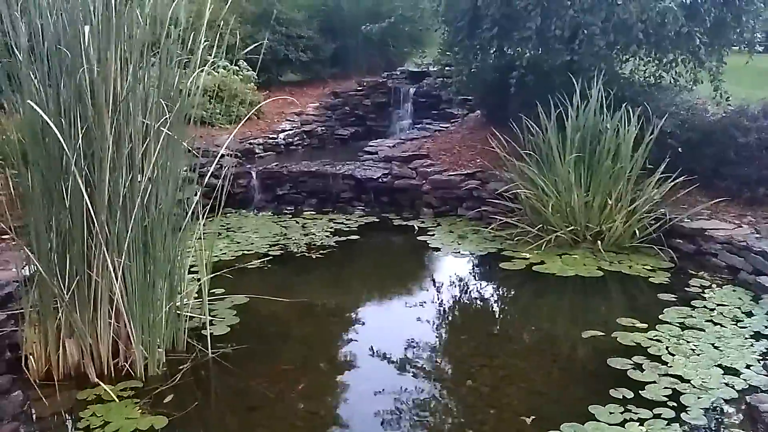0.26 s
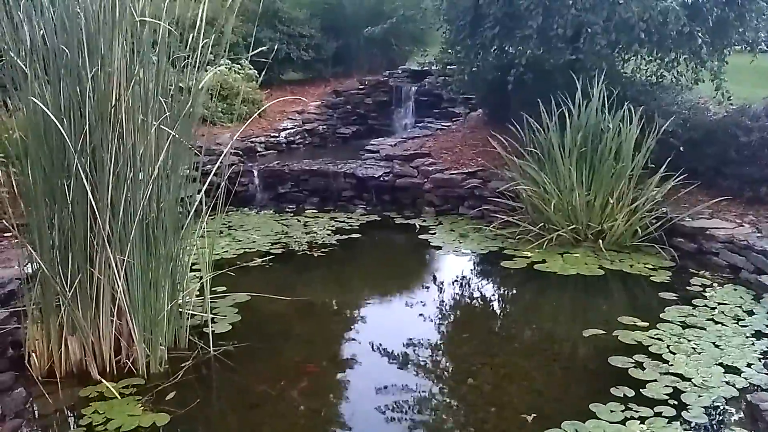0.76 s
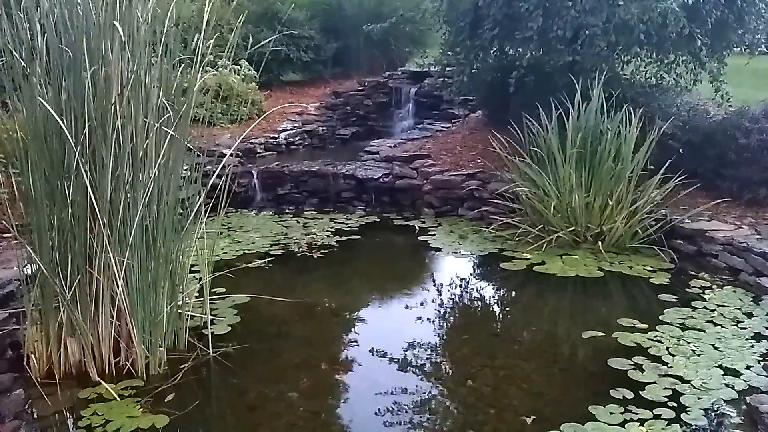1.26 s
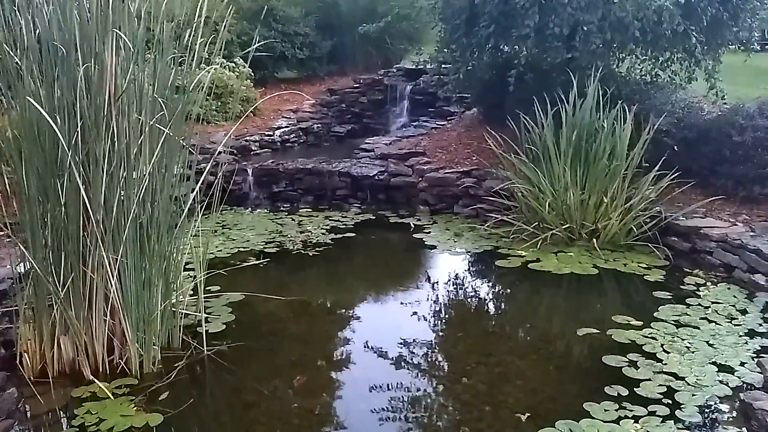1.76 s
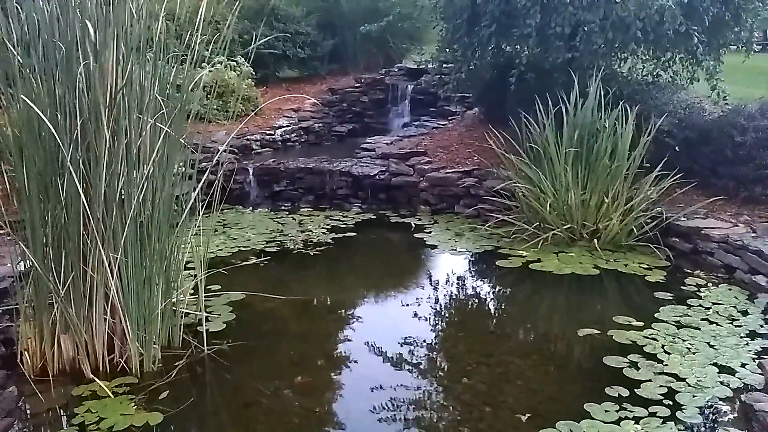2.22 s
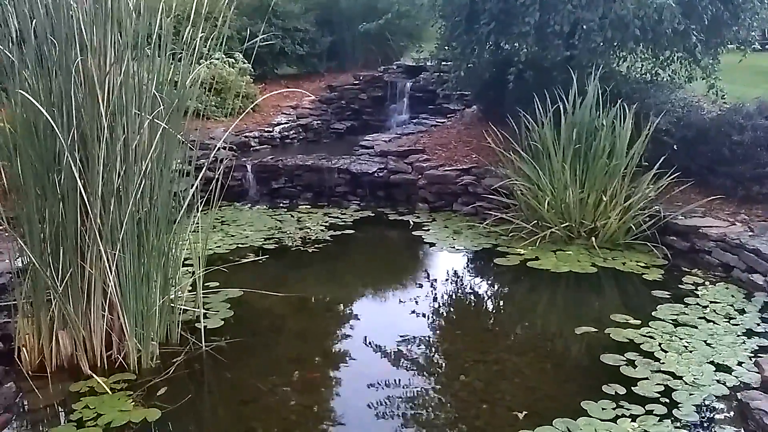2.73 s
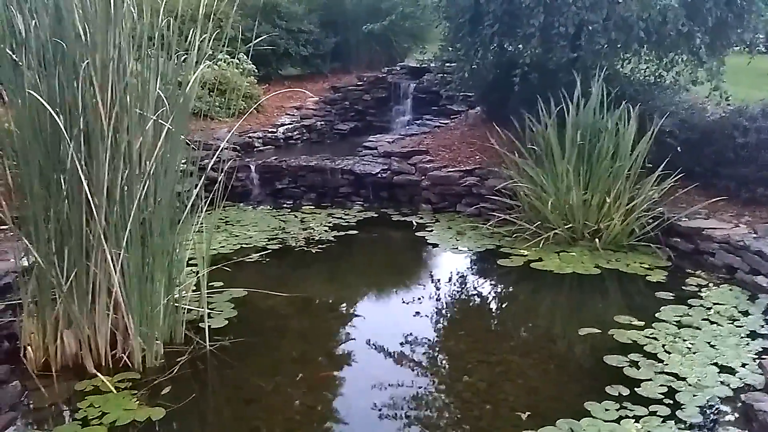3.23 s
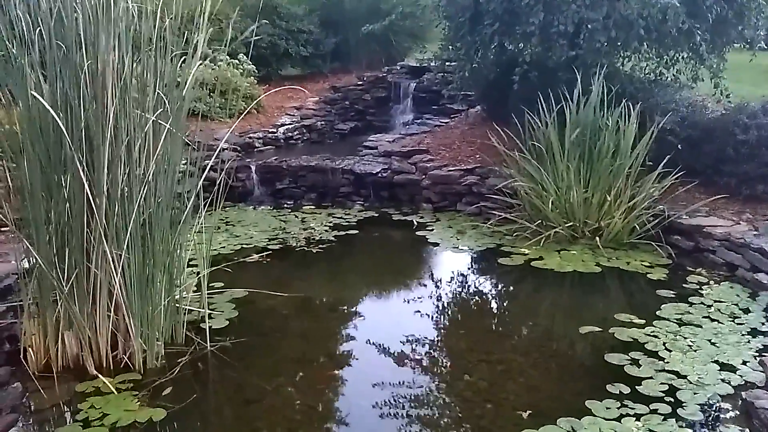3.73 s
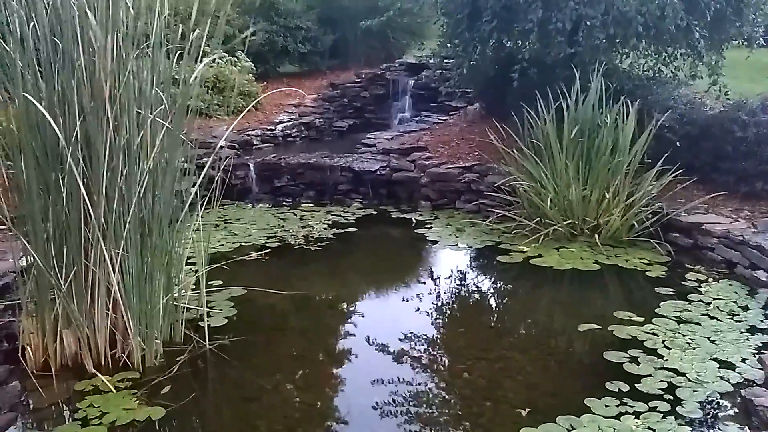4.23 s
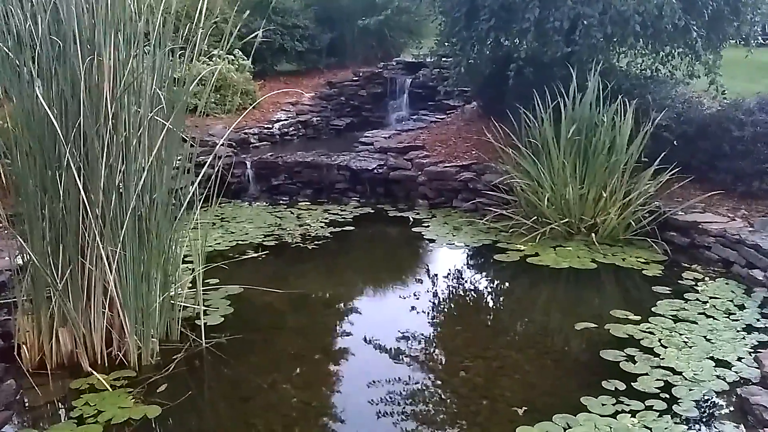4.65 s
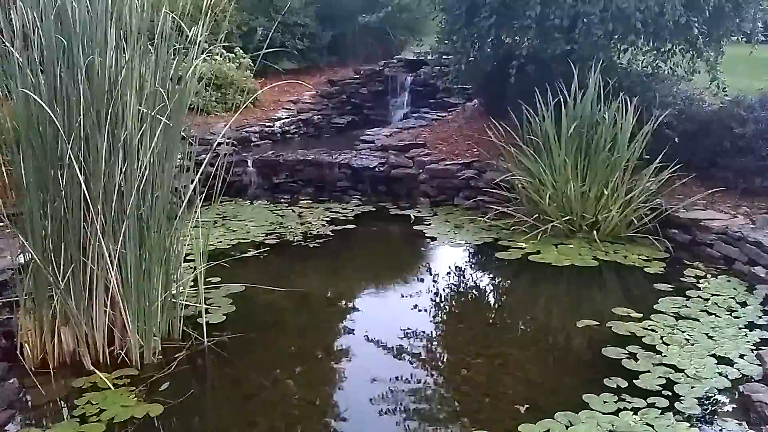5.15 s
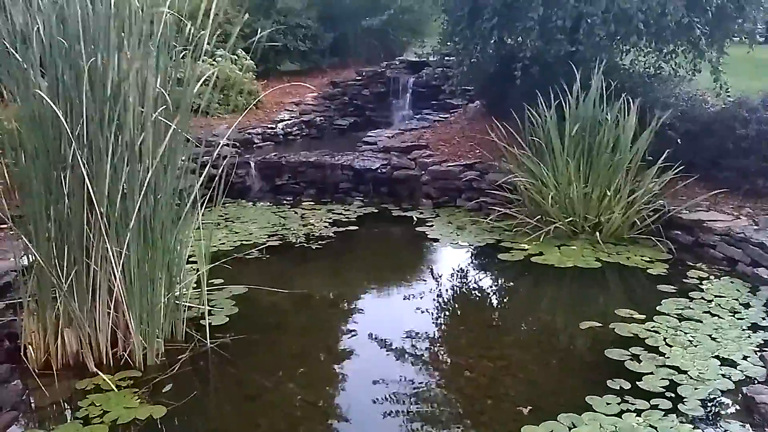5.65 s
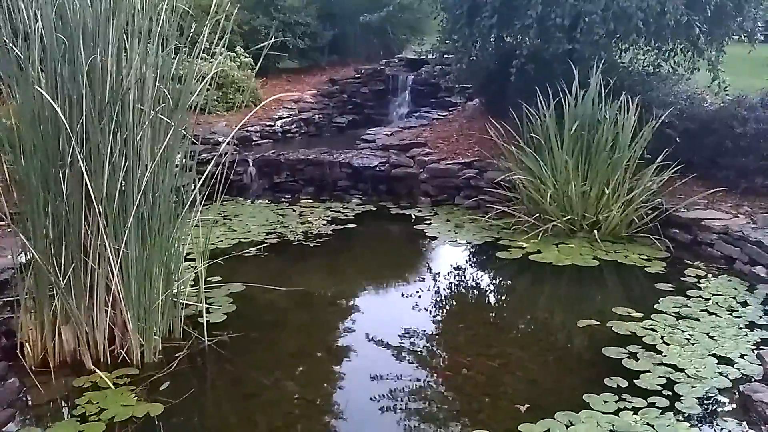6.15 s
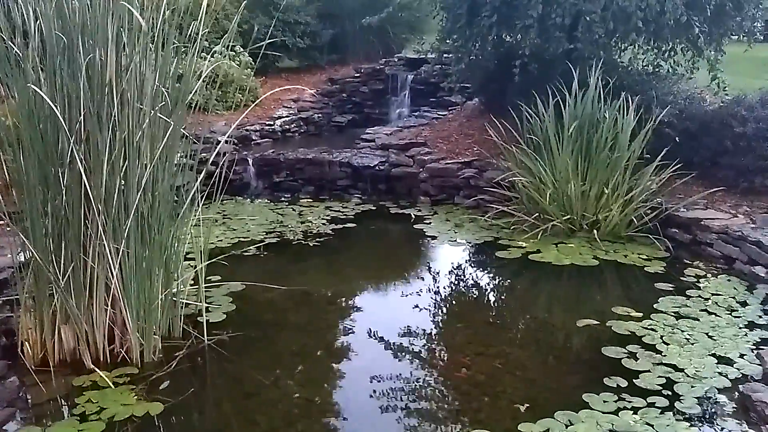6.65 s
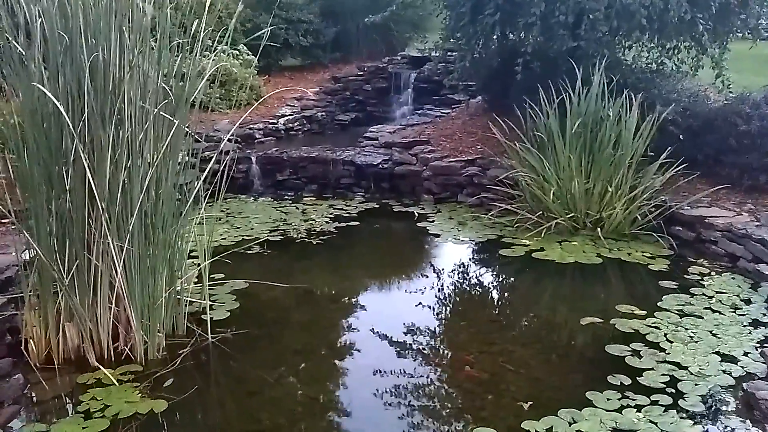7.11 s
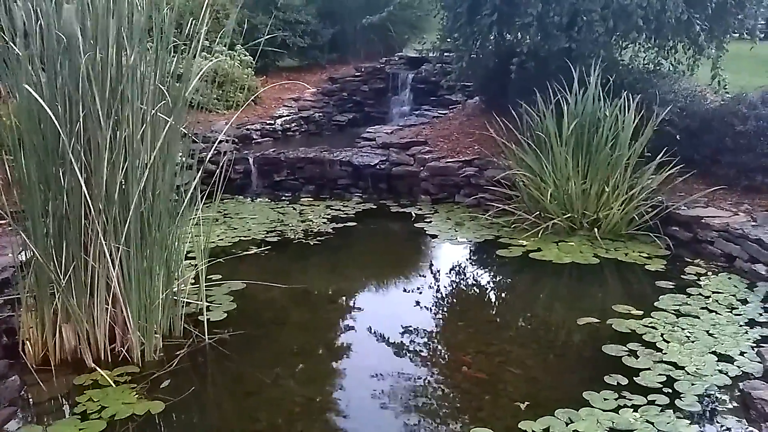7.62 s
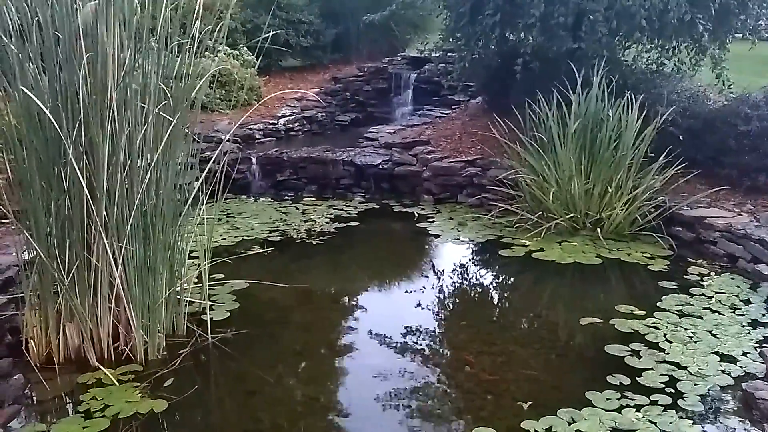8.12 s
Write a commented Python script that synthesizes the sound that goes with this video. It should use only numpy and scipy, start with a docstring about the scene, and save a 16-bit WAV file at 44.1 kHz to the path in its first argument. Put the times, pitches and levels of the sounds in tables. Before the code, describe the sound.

A small stone waterfall runs into a garden pond, a continuous bright splashing hiss with uneven gurgles, plopping bubbles and droplets ticking on rock. The water is louder on the left. Wind bumps the microphone in short low rumbles from either side, strongest near the end and mostly on the right. A few soft knocks touch the left side in the first half, and a faint pump hum lies underneath.

```python
"""Garden waterfall in wind

A small waterfall runs over stones into a pond, heard by two microphone ports, the left one facing it.
Surges lift the gurgle, splash and patter; the spray swells on its own. Bubbles plop, droplets tick,
slugs of water slap stone, and glassy rings and thin whistles come and go. Wind buffets each port
separately over a pump's hum; a few knocks and one flap of wind thump at the left port."""
import sys
import numpy as np
from scipy import signal
from scipy.io import wavfile
from scipy.ndimage import uniform_filter1d

SR = 44100
rng = np.random.default_rng(int(sys.argv[2]) if len(sys.argv) > 2 else 0)


def pcm_store(signal):
    """Save signal as 16-bit PCM."""
    levels = np.round(np.clip(np.atleast_2d(signal), -1, 1) * 32767)
    wavfile.write(sys.argv[1], SR, levels.astype(np.int16).T)


N = 369558
TIME_S = np.arange(N) / SR


def gain_of(db):
    """Decibels to amplitude."""
    return 10 ** (np.asarray(db) / 20)


def unit_rms(x):
    """Scales to rms 1."""
    return x / np.sqrt(np.mean(x ** 2) + 1e-20)


def column(table, index, at, warp=np.asarray):
    """Interpolates one column of a table against the first."""
    rows = np.array(table, float)
    return np.interp(warp(at), warp(rows[:, 0]), rows[:, index])


def add(mix, start_s, sound):
    """Mixes a sound in, cut off at the end of the mix."""
    part = mix[round(start_s * SR):][:len(sound)]
    part += sound[:len(part)]


def wobble(shape):
    """Slow noise at rms 1."""
    return unit_rms(uniform_filter1d(uniform_filter1d(rng.standard_normal(shape), size=700), size=700))


def band_noise(size, hz, width_hz):
    """Noise through a steep resonance: shifted down by hz, smoothed twice, shifted back."""
    carrier = np.exp(2j * np.pi * hz * np.arange(size) / SR)
    pole = np.exp(-np.pi * width_hz / SR)
    shifted = rng.standard_normal(size) / carrier
    smoothed = signal.lfilter([(1 - pole) ** 2], [1, -2 * pole, pole ** 2], shifted)
    return 2 * (carrier * smoothed).real


def tone(hz, width_hz, size, fuzz):
    """A wavering pitch: narrow noise that keeps the share fuzz of its level swings."""
    narrow = band_noise(size + SR // 4, hz, width_hz)[SR // 4:]
    envelope = np.sqrt(abs(uniform_filter1d(narrow ** 2, size=400)) + 1e-20)
    return unit_rms(narrow / envelope ** (1 - fuzz))


def bubble(hz, t60_s, glide, swell_s, phase_rad=0):
    """A bubble's pulsing dies fast while its pitch climbs near the surface."""
    t = np.arange(round(t60_s * SR)) / SR
    pulsing = np.sin(2 * np.pi * hz * t * (1 + glide * t / t60_s) + phase_rad)
    return pulsing * gain_of(-60 * t / t60_s) * (1 - np.exp(-t / swell_s))


def water(colour, level_db, lead_ms, phase_rad, patch_db, flicker_db, drops_per_s, drop_share, frame=256):
    """Noise and single drops share one colour; patches drift and flickers land on all pitches."""
    drops = gain_of(2.9 * np.minimum(rng.exponential(1, N), 5)) * (rng.random(N) < drops_per_s / SR)
    source = np.sqrt(1 - drop_share) * rng.standard_normal((2, N))
    source += np.sqrt(drop_share) * unit_rms(drops * rng.choice([-1., 1.], N))
    framing = dict(nperseg=frame, noverlap=frame * 3 // 4)
    hz, t, (left, other) = signal.stft(source, SR, **framing)
    patches = uniform_filter1d(rng.standard_normal(left.shape), size=4, axis=0)
    patches = unit_rms(uniform_filter1d(patches, size=24, axis=1))
    flicker = unit_rms(uniform_filter1d(rng.standard_normal(len(t)), size=9))
    left_db, right_db, likeness = (column(colour, k, hz + 1, np.log)[:, None] for k in (1, 2, 3))
    # The right port hears the shared part lead_ms earlier, its phase turned.
    lead = np.exp(1j * (2 * np.pi * hz * lead_ms / 1000 + phase_rad))[:, None]
    right = likeness * lead * left + np.sqrt(1 - likeness ** 2) * other
    spectrum = np.array([left * gain_of(left_db), right * gain_of(right_db)])
    spectrum *= gain_of(patch_db * patches + flicker_db * flicker)
    out = signal.istft(spectrum, SR, **framing)[1][:, :N]
    return out / np.std(out[0]) * gain_of(level_db)


# Each row: start in seconds, lift of the gurgle in dB.
SURGE_LIFTS = [(.07, 2), (.56, 5), (.995, 4.5), (1.11, 5.5), (1.459, 8), (2.32, 5.5), (2.61, 7.5),
               (2.94, 3.5), (3.1, 5), (3.55, 9), (4.045, 7), (4.499, 4.5), (4.772, 8), (5.068, 7),
               (5.661, 4), (6.531, 9), (6.85, 10), (6.979, 10), (7.18, 8), (7.65, 5), (8.109, 3)]

def surges(rise_s=0.005, fall_s=0.28):
    """Lift in dB: each surge of the fall rises quickly and sinks back slowly."""
    t = TIME_S[::32]
    corners_s = [0, rise_s, rise_s + fall_s]
    lifts_db = [np.interp(t - start_s, corners_s, [0, db, 0]) for start_s, db in SURGE_LIFTS]
    return np.interp(TIME_S, t, np.max(lifts_db, axis=0))


# Each row: frequency in Hz, left and right relative level in dB, left-right likeness from 0 to 1.
GURGLE_COLOUR = [(218, -67.5, -81, 1), (350, -81.5, -82, 0.52), (476, -73.5, -77.5, 0.21),
                 (620, -82.5, -76.5, 0.92), (850, -78, -83.5, 0.98), (960, -73.5, -77, 0.2),
                 (1100, -78.5, -81.5, 0), (1250, -86, -76, 0.45), (1434, -76, -79.5, 1),
                 (1690, -76, -75, 0.44), (2060, -79, -80, 1), (2300, -71, -76, 0.85),
                 (2670, -84.5, -83.5, 0.2)]

def gurgle(lift_db):
    """The low, patchy part of the fall."""
    return water(GURGLE_COLOUR, -55.5 + lift_db, lead_ms=0, phase_rad=3.34,
                 patch_db=3.5, flicker_db=2.5, drops_per_s=350, drop_share=0.041, frame=512)


# Each row: frequency in Hz, left and right relative level in dB, left-right likeness from 0 to 1.
SPLASH_COLOUR = [(2110, -106.5, -105.5, 0.097), (2330, -76, -68.5, 0.092), (2856, -70, -82, 0.56),
                 (2950, -59.5, -60, 0.17), (3100, -66, -82, .15), (3350, -60.5, -88, .2),
                 (3410, -64, -71, 0.15), (4200, -60, -69.5, 0.16), (4900, -58.5, -68.5, .2),
                 (6080, -64.5, -82, 0.45), (5900, -68.5, -84, .12), (7900, -80.5, -80, .12)]
# Each row: time in seconds, level in dB before trim and surges.
SPLASH_SWELL = [(0.0, -40.5), (1.2, -38), (2.2, -38.5), (3.4, -39.5), (4.7, -37.5), (5.5, -40), (6.3, -39),
                (7.0, -37), (8.37, -40.5)]

def splash(lift_db, trim_db=-2.12):
    """The middle of the fall, dense with drops."""
    level_db = column(SPLASH_SWELL, 1, TIME_S) + lift_db + trim_db
    return water(SPLASH_COLOUR, level_db, lead_ms=0.461, phase_rad=1.57,
                 patch_db=2, flicker_db=-0.23, drops_per_s=810, drop_share=0.12)


# Each row: frequency in Hz, left and right relative level in dB, left-right likeness from 0 to 1.
SPRAY_COLOUR = [(5000, -106.5, -105, 0.043), (5400, -70, -78.5, 0.13), (7530, -58, -73.5, 0.12),
                (8940, -58, -72, 0.11), (11300, -61, -71.5, 0.087), (11900, -65, -85, 0.21),
                (14300, -74.5, -81, 0.089), (14200, -87, -106, 0.07), (15700, -73, -88, 0.11)]
# Each row: time in seconds, left level in dB.
SPRAY_SWELL = [(0.0, -39), (0.2, -36.5), (0.7, -39.5), (0.74, -30), (0.82, -34), (1.2, -39), (1.89, -35),
               (2.39, -41.5), (2.64, -40.5), (3.17, -37), (3.56, -39), (3.83, -37), (4.01, -42), (4.4, -42),
               (4.48, -36), (4.58, -41), (4.66, -36), (4.78, -35.5), (5.0, -39.5), (5.11, -34.5),
               (5.28, -42.5), (5.35, -35), (5.4, -39), (5.44, -35.5), (5.7, -42), (6.03, -37), (6.35, -39),
               (6.58, -35), (6.77, -37.5), (7.0, -34), (8.02, -35.5), (8.37, -44.5)]

def spray():
    """The high hiss of the fall, swelling on its own."""
    return water(SPRAY_COLOUR, column(SPRAY_SWELL, 1, TIME_S), lead_ms=0.1, phase_rad=-1.1,
                 patch_db=2, flicker_db=1.14, drops_per_s=300, drop_share=0.065)


def patter(lift_db, base_db=-50.5, drops_per_s=300, ring_cycles=39):
    """Fine droplets: tiny bubbles of eight sizes, each ringing briefly."""
    drops = gain_of(3.5 * np.minimum(rng.exponential(1, N), 3)) * (rng.random(N) < drops_per_s / SR)
    pitches_hz = np.geomspace(3217, 5480, 8)
    kind = rng.integers(0, len(pitches_hz), N)
    rings = [bubble(hz, ring_cycles / hz, glide=0.035, swell_s=0.0011) for hz in pitches_hz]
    out = sum(signal.oaconvolve(drops * (kind == k), ring)[:N] for k, ring in enumerate(rings))
    return unit_rms(out) * gain_of(base_db + lift_db) * [[1], [-gain_of(-13)]]


# Each row: time in seconds, level at both ports in dB.
BREEZE_SWELL = [(0.0, -60), (.29, -56), (.6, -53), (.8, -54), (1.5, -54.5), (2.0, -51), (2.6, -52),
                (3.6, -50.5), (4.2, -52), (5.1, -48.5), (5.5, -64), (6.3, -51.5), (6.9, -45), (7.5, -46),
                (7.8, -53), (8.37, -55)]
# Each row: peak time in seconds, peak level in dB, port ("left" or "right").
PORT_BUFFETS = [(.79, -41, "right"), (.84, -36.5, "right"), (.91, -39, "right"), (0.956, -33.5, "right"),
                (1.02, -43, "left"), (1.1, -41.5, "right"), (1.14, -42, "right"), (1.368, -34.5, "right"),
                (1.43, -43, "left"), (1.635, -43.5, "left"), (2.248, -39.5, "right"), (2.33, -50, "left"),
                (2.408, -35.5, "left"), (2.515, -33, "left"), (2.6, -36, "right"), (2.707, -27.5, "right"),
                (2.889, -32.5, "right"), (3.33, -38.5, "right"), (3.459, -37, "right"),
                (3.52, -39.5, "right"), (4.511, -35.5, "left"), (4.6, -38, "right"), (4.87, -35, "right"),
                (5.07, -46, "right"), (5.67, -44, "left"), (5.7, -50, "right"), (5.779, -37.5, "right"),
                (5.918, -27.5, "right"), (6.039, -40, "right"), (6.113, -24, "right"),
                (6.178, -33.5, "right"), (6.43, -39, "left"), (6.51, -36, "right"), (6.556, -18.5, "right"),
                (6.628, -24, "right"), (6.69, -41, "left"), (6.68, -33, "right"), (6.735, -30, "right"),
                (6.799, -26, "right"), (6.837, -24.5, "right"), (6.865, -27, "left"),
                (6.895, -29.5, "right"), (6.913, -26.5, "left"), (6.961, -25.5, "left"),
                (6.965, -29.5, "right"), (7.035, -36, "left"), (7.05, -37, "right"), (7.112, -27, "right"),
                (7.14, -36, "right"), (7.261, -32, "right"), (7.38, -36.5, "right")]

def wind_db(t, rise_db_per_s=496, fall_db_per_s=342):
    """Wind level at each port: the breeze plus single buffets."""
    power = np.tile(gain_of(2 * column(BREEZE_SWELL, 1, t)), (2, 1))
    for peak_s, db, port in PORT_BUFFETS:
        drop_db = np.maximum(rise_db_per_s * (peak_s - t), fall_db_per_s * (t - peak_s))
        power[int(port == "right")] += gain_of(2 * (db - drop_db))
    return 10 * np.log10(power)


# Each row: frequency in Hz, relative level in dB, for light wind.
WIND_COLOUR = [(20, -66), (40, 1.5), (60, 8.5), (90, -1), (130, -12.5), (200, -21), (350, -40.5),
               (700, -73)]

def wind(left_stretch=1.47, right_stretch=0.67, lump_db=1.7):
    """Lumpy low turbulence at each port; strong gusts stretch its colour upward."""
    framing = dict(nperseg=2048, noverlap=1536)
    hz, t, spectrum = signal.stft(rng.standard_normal((2, N)), SR, **framing)
    frame_db = wind_db(t)
    # Lulls leave a far rumble, shared by the ports in opposite phase.
    shared = np.clip(0.9 - (frame_db.max(0) + 52.5) / 12, 0, 0.95)
    spectrum[1] = np.sqrt(1 - shared ** 2) * spectrum[1] - shared * spectrum[0]
    strength = np.clip((frame_db + 35) / 25, 0, 1)
    stretch = 1 + strength * [[left_stretch], [right_stretch]]
    spectrum *= gain_of(column(WIND_COLOUR, 1, (hz[:, None] + 1) / stretch[:, None, :], np.log))
    rumble = signal.istft(spectrum, SR, **framing)[1][:, :N]
    rumble /= np.sqrt(abs(uniform_filter1d(rumble ** 2, size=3000, axis=1)) + 1e-12)
    steps_s = TIME_S[::64]
    level_db = [np.interp(TIME_S, steps_s, db) for db in wind_db(steps_s)]
    return rumble * gain_of(level_db + lump_db * wobble((2, N)))


# Each row: time in seconds, left level of the hum in dB.
HUM_SWELL = [(0.0, -64.5), (0.99, -61), (1.37, -63), (2.1, -61), (3.6, -49.5), (4.56, -53), (5.79, -63.5),
             (7.22, -51.5), (8.37, -48)]

def pump(hum_hz=211.8, octave_hz=423.8):
    """A slowly swelling hum in a rough blur, and its faint octave; opposite in phase at the ports."""
    hum = tone(hum_hz, width_hz=1.5, size=N, fuzz=0.3)
    blur = gain_of(-8) * tone(hum_hz, width_hz=50, size=N, fuzz=1)
    octave = gain_of(-73) * tone(octave_hz, width_hz=8, size=N, fuzz=0.7)
    swell = gain_of(column(HUM_SWELL, 1, TIME_S))
    return (hum + blur) * swell * [[1], [-gain_of(-6)]] + octave * [[1], [-gain_of(-5.5)]]


# Each row: start in seconds, level in dB, starting pitch in Hz.
CLEAR_PLOPS = [(0.076, -39, 1330), (.207, -37, 2200), (.313, -50, 1335), (.651, -38, 860), (.838, -41, 840),
               (.878, -41, 806), (.995, -34.5, 860), (1.186, -42, 750), (1.559, -38, 1890),
               (2.037, -36, 2220), (2.109, -35, 900), (2.187, -32, 870), (2.298, -32, 950),
               (2.329, -29.5, 833), (2.616, -35, 1180), (3.017, -36, 2110), (3.536, -28, 2160),
               (3.545, -42, 1510), (3.553, -35, 880), (3.769, -31, 2290), (4.43, -29, 956),
               (4.497, -36, 770), (4.519, -38, 2440), (4.783, -34, 850), (5.059, -41, 775),
               (5.07, -43, 1430), (5.103, -29, 2300), (5.085, -46, 980), (5.17, -35, 970),
               (5.207, -46, 735), (5.316, -43, 820), (5.755, -36.5, 845), (6.573, -30, 2180),
               (6.586, -33, 774), (6.6, -46, 1680), (6.625, -40, 840), (6.733, -33, 740),
               (6.785, -34, 1600), (6.848, -34, 827), (6.887, -44, 2200), (6.945, -43, 1950),
               (7.013, -34.5, 800), (7.168, -34, 846), (7.276, -28, 1690), (7.282, -33, 1224),
               (7.541, -36, 1260), (7.655, -31, 1050), (7.77, -35.5, 890), (7.809, -32.5, 880),
               (7.84, -40, 810), (8.123, -31, 814), (8.15, -43, 850)]

def plops(port_phase_rad=3.6):
    """Clear bubbles, each trailed by two fainter ones, among many small ones at random."""
    small = [(when * N / SR, -51 + 9 * size ** 2, 600 * 3.6 ** pitch ** 2)
             for when, pitch, size in rng.random((700, 3))]
    trail = [(start_s + 0.00391 + 0.045 * late, db - 4.5 - 6 * fainter, hz * (0.92 + 0.35 * pitch))
             for start_s, db, hz in CLEAR_PLOPS for late, fainter, pitch in rng.random((2, 3))]
    out = np.zeros((2, N))
    for start_s, db, hz in list(CLEAR_PLOPS) + trail + small:
        t60_s = 0.032 + 0.025 * rng.random()
        # Low and high plops lean left, middle ones right.
        lean_db = 3.5 * np.cos(2 * np.pi * np.log(hz / 850) / np.log(2.7))
        for port, sign, phase_rad in zip(out, (1, -1), (0, port_phase_rad)):
            plop = bubble(hz, t60_s, glide=0.04, swell_s=0.005, phase_rad=phase_rad)
            add(port, start_s, gain_of(db + sign * lean_db / 2) * plop)
    return out


# Each row: start in seconds, peak in dB before the port gains.
CLEAR_TICKS = [(.2274, -22), (.5474, -23), (.7346, -5.7), (.738, -15), (.7665, -19), (.775, -19),
               (1.258, -23), (1.4835, -24), (1.5551, -17.5), (1.8841, -22), (2.1021, -23), (3.7783, -22),
               (3.8063, -24), (4.6392, -21), (4.7546, -21), (5.1218, -21), (5.1865, -23), (5.4254, -21.5),
               (5.4485, -22), (6.574, -22), (6.8648, -21), (7.1848, -20), (7.3452, -21), (7.4367, -22),
               (7.5507, -21), (7.6803, -21)]

def ticks(crack_hz=8800, port_gains_db=(-1, -13)):
    """Droplets hit stone: a bright crack with a short scattered tail; fainter ones fall at random."""
    out, t = np.zeros((2, N)), np.arange(2000) / SR
    crack = np.sin(2 * np.pi * crack_hz * t) * t / 0.00024 * np.exp(1 - t / 0.00024)
    body = 0.14 * np.sin(2 * np.pi * 6000 * t) * t / 0.0003 * np.exp(1 - t / 0.0003)
    faint = [(when * N / SR, -32 + 7 * size ** 2) for when, size in rng.random((50, 2))]
    for start_s, db in list(CLEAR_TICKS) + faint:
        for port, port_db in zip(out, port_gains_db):
            tail = unit_rms(band_noise(len(t), crack_hz, width_hz=3800)) * gain_of(-16 - 60 * t / 0.05)
            add(port, start_s, gain_of(db + port_db) * (crack + body + tail))
    return out


def fading_note(modes, length_s, fade_db, fuzz, edge_share, throb_db):
    """Wavering tones that throb and fade together between soft edges."""
    size = round(length_s * SR)
    chord = sum(gain_of(db) * tone(hz, width_hz, size, fuzz) for hz, width_hz, db in modes)
    shape_db = throb_db[:size] - np.linspace(0, fade_db, size)
    return chord * gain_of(shape_db) * signal.windows.tukey(size, edge_share)


# Each row: start in seconds, length in seconds, level in dB, pitch in Hz, width in Hz.
GLASSY_RINGS = [(0.552, 0.16, -50, 5050, 400), (0.944, 0.13, -41, 4300, 450), (1.01, .1, -41, 4900, 100),
                (1.114, 0.095, -40.5, 5300, 350), (1.46, .14, -42, 4200, 300),
                (1.616, 0.079, -36.5, 4670, 220), (2.319, 0.14, -46, 5340, 120),
                (2.621, .14, -40.5, 4900, 300), (2.615, 0.12, -37, 5500, 500), (2.764, .3, -46, 4650, 200),
                (2.966, 0.16, -42, 4640, 150), (3.105, 0.12, -43, 4900, 220), (3.23, 0.22, -47, 4620, 180),
                (3.352, 0.28, -46, 4960, 150), (3.44, 0.14, -40, 4590, 120), (3.57, 0.079, -32, 4700, 260),
                (3.632, 0.19, -36, 4770, 420), (4.501, 0.27, -40.5, 4400, 500),
                (4.775, 0.079, -42, 4900, 220), (4.774, 0.12, -40.5, 4650, 90), (4.782, .1, -42, 3400, 120),
                (5.081, .14, -38, 4770, 480), (5.33, 0.15, -43, 4870, 250), (5.542, 0.13, -47, 4900, 200),
                (5.725, 0.14, -45, 5400, 90), (6.4, .1, -42, 4550, 350), (6.664, 0.066, -38.5, 4080, 250),
                (6.672, .08, -41, 4700, 300), (6.849, 0.24, -43, 4800, 350), (6.96, 0.09, -41, 4820, 300),
                (6.96, .12, -42, 5900, 300), (7.19, 0.3, -40.5, 4660, 230)]

def glassy_rings(throb):
    """Fuzzy, throbbing rings in the trickle, mostly left."""
    out = np.zeros(N)
    for start_s, length_s, db, hz, width_hz in GLASSY_RINGS:
        ring = fading_note([(hz, width_hz, db)], length_s, fade_db=8, fuzz=1, edge_share=0.15,
                           throb_db=2 * throb[round(start_s * SR):])
        add(out, start_s, ring)
    return out * [[1], [gain_of(-17)]]


# Each row: start in seconds, level in dB, centre in Hz.
STONE_SPLATS = [(0.5576, -47, 2970), (1.468, -34, 3700), (2.623, -40, 2920), (4.905, -45, 2980),
                (5.072, -38, 2950), (5.671, -42, 2950), (6.525, -34.5, 3340), (6.6477, -35.5, 2610),
                (6.933, -37, 2840), (6.999, -34.5, 2640), (7.182, -38.5, 2240)]

def splats(rise_s=0.0014, t60_s=0.15):
    """Slugs of water slap stone: a quick burst of noise around one pitch."""
    out, t = np.zeros(N), np.arange(2600) / SR
    for start_s, db, hz in STONE_SPLATS:
        burst = unit_rms(band_noise(len(t), hz, width_hz=450))
        add(out, start_s, burst * gain_of(db - 60 * t / t60_s) * (1 - np.exp(-t / rise_s)))
    return out * [[1], [-gain_of(-12)]]


# Main tone, then side tones. Each row: pitch in Hz, width in Hz, relative level in dB.
WHISTLE_MODES = [(3733, 12, 0), (2962, 60, -15), (3600, 90, -6), (3971, 14, -7), (4330, 40, -11)]
# Each row: start in seconds, length in seconds, level in dB, fade in dB, side-tone gain in dB.
WHISTLE_NOTES = [(1.01, .1, -39.5, 3, -8), (1.112, .14, -38.5, 7, -7), (2.328, .17, -36, 11, -5),
                 (3.54, .152, -40, 2, 2), (3.72, .05, -49, 3, -3), (4.775, .15, -50, 4, 9)]

def whistles(throb):
    """Thin raspy tones that start abruptly and fade, mostly left."""
    out = np.zeros(N)
    main, *sides = WHISTLE_MODES
    for start_s, length_s, level_db, fade_db, side_db in WHISTLE_NOTES:
        modes = [main] + [(hz, width_hz, db + side_db) for hz, width_hz, db in sides]
        note = fading_note(modes, length_s, fade_db, fuzz=0.35, edge_share=0.12,
                           throb_db=0.5 * throb[round(start_s * SR):])
        add(out, start_s, gain_of(level_db) * note)
    return out * [[1], [gain_of(-17)]]


# A few knocks and, at 6.91 s, one flap of wind. Each row: time of the snap in seconds, level in dB.
LEFT_PORT_THUMPS = [(1.4282, -25.5), (1.6208, -34), (4.052, -39), (4.1672, -28), (6.91, -35)]

def thumps(snap_delay_s=0.0004):
    """Sharp low thumps at the left port: a quick snap, then the membrane swings back."""
    out, t = np.zeros(N), np.arange(900) / SR
    snap = 0.6 * np.sin(2 * np.pi * 1300 * t) * np.exp(-((t - snap_delay_s) / 0.0005) ** 2)
    swing = -np.sin(2 * np.pi * 200 * t) * np.exp(-t / 0.005)
    for snap_s, db in LEFT_PORT_THUMPS:
        add(out, snap_s - snap_delay_s, gain_of(db) * (snap + swing))
    return out * [[1], [gain_of(-51)]]


def scene():
    """The fall, its small events, thumps, wind and pump at the two ports."""
    surge_db = surges()
    splash_lift_db = 0.35 * surge_db
    fall = gurgle(surge_db) + splash(splash_lift_db) + spray() + patter(splash_lift_db)
    hits = plops() + splats() + ticks() + thumps()
    throb = wobble(N)
    return fall + hits + whistles(throb) + glassy_rings(throb) + wind() + pump()


def record(dry, low_cut_hz=38, band_limit_hz=15770):
    """The lowest bass below the cut is removed; a steep low-pass limits the band."""
    low_cut = signal.butter(3, low_cut_hz, "high", fs=SR, output="sos")
    band_limit = signal.firwin(511, band_limit_hz, window=("kaiser", 9), fs=SR)
    return signal.oaconvolve(signal.sosfilt(low_cut, dry), band_limit[None], "same")


dry = scene()
out = record(dry)
pcm_store(out)
```